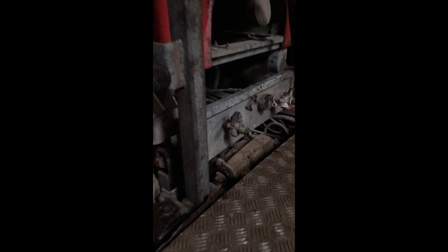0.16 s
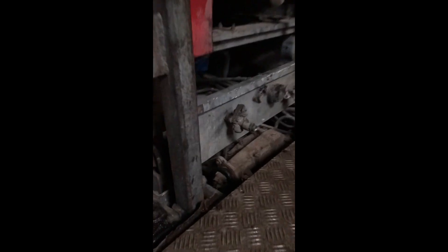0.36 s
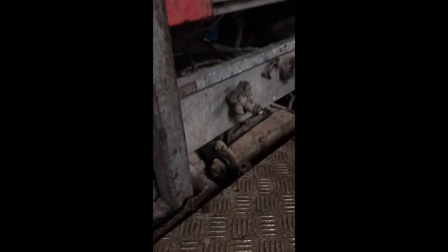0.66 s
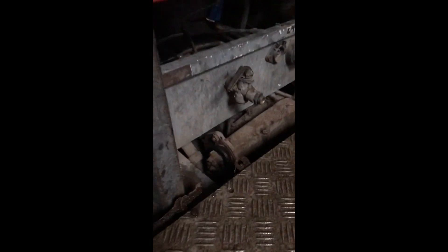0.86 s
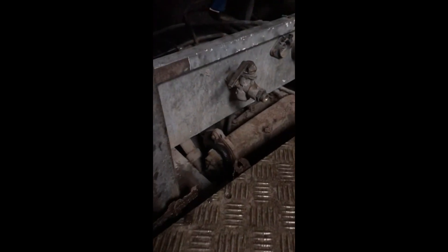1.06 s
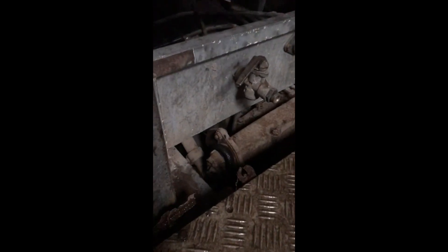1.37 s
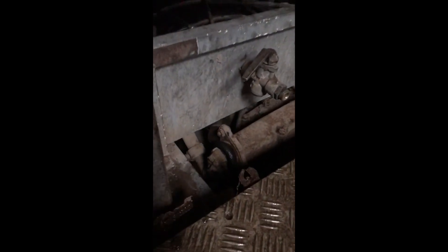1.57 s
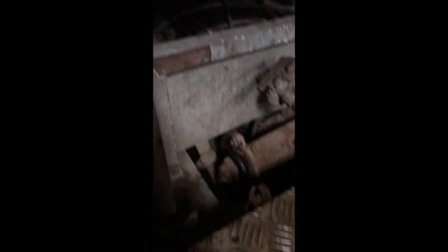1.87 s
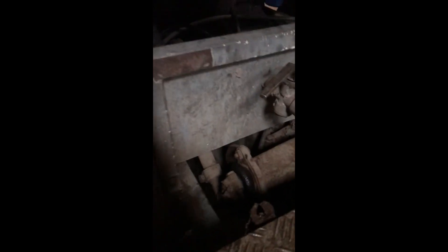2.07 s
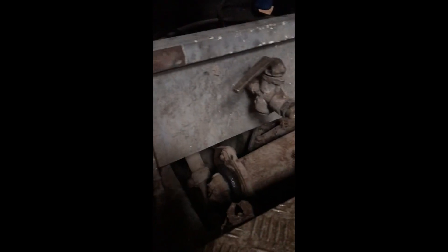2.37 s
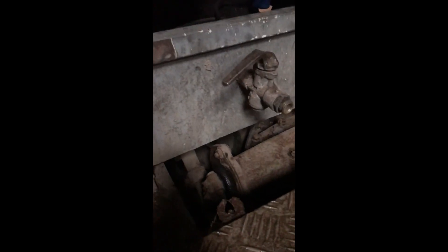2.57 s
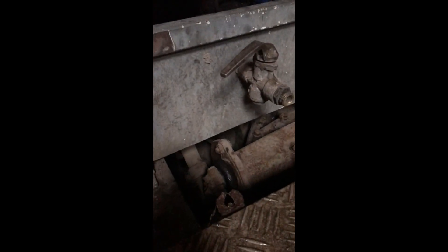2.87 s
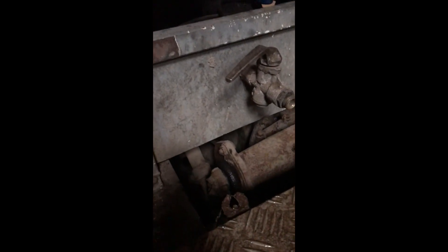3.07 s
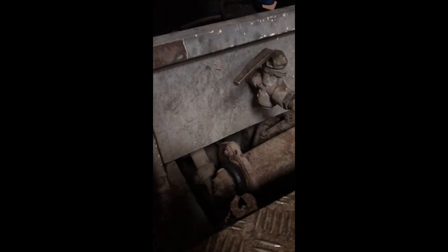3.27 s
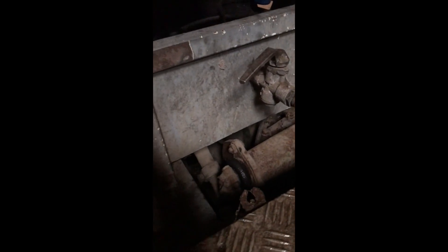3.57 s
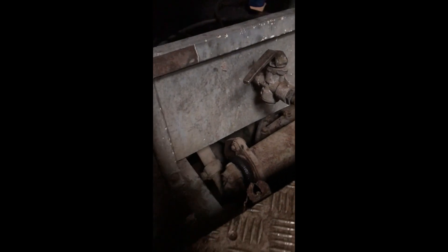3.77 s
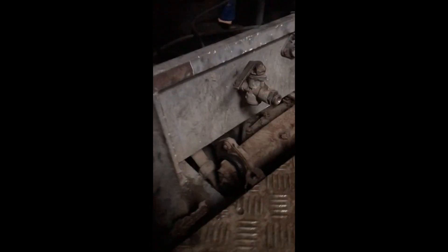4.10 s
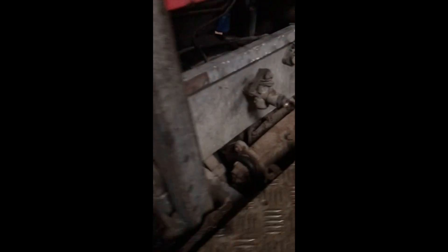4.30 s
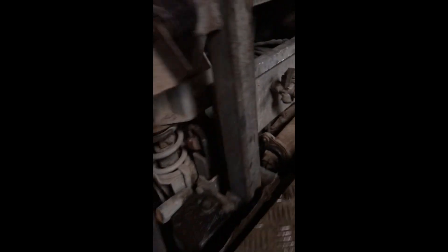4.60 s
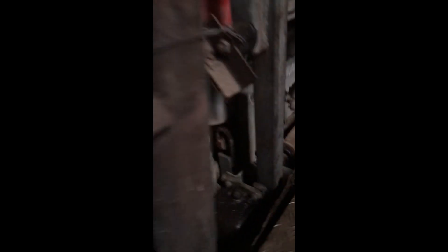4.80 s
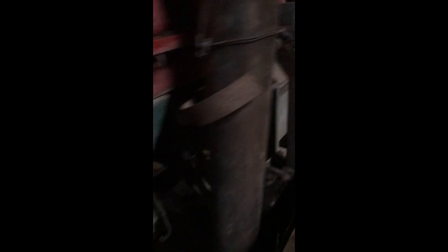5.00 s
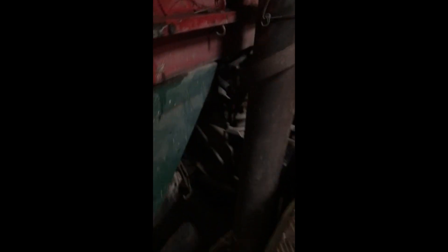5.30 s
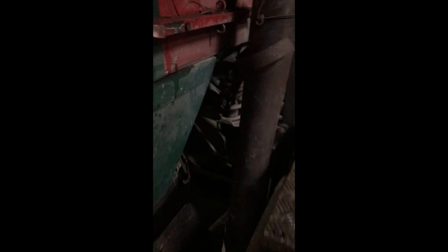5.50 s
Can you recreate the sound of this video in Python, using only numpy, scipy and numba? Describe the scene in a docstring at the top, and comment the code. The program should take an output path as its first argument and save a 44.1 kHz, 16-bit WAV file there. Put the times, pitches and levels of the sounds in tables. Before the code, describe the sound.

A phone sits close to a truck's chassis in a garage. A hissing air release is already dying away at the start. A short low groan sinks at 0.3 s, a thin high whisper of feed air follows from 0.45 s, and the valve gear gives a dull-then-bright knock at 0.9 s. At 1.2 s air blasts out with a crack and thump, chokes at 1.4 and 1.5 s, then drains with a ringing, falling hiss; a groan follows at 1.8 s. The second round groans at 2.3 s, whispers, swishes faintly and knocks at 2.9 s, then bursts loudest at 3.2 s, stuttering before draining and groaning at 3.7 s. The third groans at 4.1 s, knocks at 4.65 s, swishes at 4.8 s and blasts at 4.9 s, stuttering twice, with a last groan around 5.3 s. Metallic reflections, brief room echo, wavering faint hiss and low rumble surround everything.

```python
"""A parked truck's air brakes are applied and let off again and again in a garage, a phone close to the chassis.
At first a release is dying away. Then come three rounds: the linkage groans, feed air whispers and the valve
gear knocks; a faint swish comes before the second round's knock, another before the third round's release.
The port opens with a blast of noise, chokes twice and drains with a ringing hiss of gliding, filtered noise; the
linkage groans again. Steel plates echo the air, the garage rings briefly; a wavering hiss and a rumble lie below."""
import sys
import numpy as np
from scipy import signal
from scipy.fft import rfft, irfft
from scipy.io import wavfile
from scipy.ndimage import map_coordinates
from numba import njit

SR = 44100
rng = np.random.default_rng(int(sys.argv[2]) if len(sys.argv) > 2 else 0)


def inscribe(sig):
    """Save sig as 16-bit PCM at rate SR to the path in sys.argv[1].

    A 1-D sig is mono; a 2-D sig holds one channel per row.
    Samples are clipped to [-1, 1] before scaling.
    """
    pcm = np.round(np.clip(np.atleast_2d(sig).T, -1, 1) * 32767)
    wavfile.write(sys.argv[1], SR, pcm.astype(np.int16))


N = 249165
T = np.arange(N) / SR  # time, s
HZ = np.maximum(np.fft.rfftfreq(N, 1 / SR), 1)

# the brakes are let off; the first release is already dying away: start [t/s], jet [level/dB],
# kick over the port [level/dB], port [level/dB], spray once the valve is wide, before its widening lift [level/dB],
# hold [t/s], port fade [t/s], top port pitch [f/Hz], late sink of the pitch [Hz per s]
RELEASES = [(-0.68, -15.5, 10, -28, -34, .51, 0.44, 4220, 0),
            (1.225, -15.2, 12, -23.5, -32.4, .5, 0.31, 4130, 100),
            (3.170, -13, 7.5, -23.6, -33, .48, 0.32, 4150, 100),
            (4.917, -17.8, 16.5, -26, -34.1, .48, 0.31, 4020, 1600)]
OPEN_S, BLAST_S = 0.011, 0.133  # the port opens; the full-pressure jet lasts


def undb(db):
    """Turn decibels into gain."""
    return 10 ** (np.asarray(db) / 20)


def unit(x):
    """Scale to an average strength (rms) of 1."""
    return x / np.sqrt(np.mean(x ** 2))


def shape(points):
    """Gain at every frequency, drawn through (Hz, dB) points."""
    hz, db = np.transpose(points)
    return undb(np.interp(np.log(HZ), np.log(hz), db))


def noise(gain):
    """Noise of rms 1 with the given gain at every frequency."""
    return unit(irfft(rfft(rng.standard_normal(N)) * gain, N))


def walk(rate):
    """Smooth random wandering of rms 1 that changes about rate times a second."""
    return noise(1 / (1 + (HZ / rate) ** 4))


def gate(start, length, rise, fall):
    """Open in rise s, stay open until start + length, then die away with time constant fall."""
    return np.clip((T - start) / rise, 0, 1) * np.exp(-np.maximum(T - start - length, 0) / fall)


@njit
def bandpass(x, hz, width):
    """A resonance whose centre can move: two stored values swing against each other."""
    y, band, low = np.empty(len(x)), 0., 0.
    for i in range(len(x)):
        g, k = np.tan(np.pi * hz[i] / SR), width / hz[i]
        v = (band + g * (x[i] - low)) / (1 + g * (g + k))
        band, low = 2 * v - band, low + 2 * g * v
        y[i] = k * v
    return y


def glide(centre, width, source):
    """Two moving resonances in a row, scaled to rms 1."""
    return unit(bandpass(bandpass(source, centre, width), centre, width))


def blasts(crack_db=3, crack_s=0.013, thump_s=0.052, sag_db_per_s=64, thump_db=-24.2):
    """A broad jet starts with a crack and a thump, sags with the pressure and is cut off."""
    # colour of the jet: [f/Hz], [level/dB per Hz]
    jet_colour = [(60, -37.5), (300, -18.5), (700, -11.5), (1200, -10.5), (2000, -7.5), (2700, -2),
                  (4500, -5), (5600, -1.5), (7000, -3), (10000, -2), (11500, 2), (15800, 0)]
    # colour of the thump: [f/Hz], [level/dB per Hz]
    thump_colour = [(10, -62.5), (30, -19), (60, -2.5), (125, -3), (190, -6), (260, -3), (500, -19),
                    (1500, -44.5)]
    jet, thump, out = noise(shape(jet_colour)), noise(shape(thump_colour)), 0
    for start, jet_db, *_ in RELEASES:
        age = np.maximum(T - start, 0)
        level_db = jet_db - sag_db_per_s * age + crack_db * np.exp(-age / crack_s)
        out += jet * gate(start, BLAST_S, OPEN_S, 0.0058) * undb(level_db)
        out += thump * gate(start, 0.0052, .004, thump_s) * undb(jet_db + thump_db)  # level is over the jet's
    return out


def drain(port_width_hz=1890.0, core_width_hz=930.0, core_db=-5, flutter_db=0.46, sputter_db=.8):
    """Turbulent air rings the port; fine spray and a low rush go with it; the valve chokes all three."""
    # the valve nearly shuts for a moment: [t/s], depth [level/dB], half width [t/s], surge just before [level/dB]
    choke_rows = [(1.409, 18.5, 0.012, 2.5), (1.5, 11.5, .016, 1), (3.332, 13.5, 0.016, 5.5),
                  (3.435, 4.5, .014, 0), (5.079, 8, 0.009, -1), (5.17, 7.5, 0.02, 6)]
    # colour of the fine spray: [f/Hz], [level/dB per Hz]
    spray_colour = [(2000, -28), (5000, -2), (7000, -12), (8200, -5), (9700, 2.5), (10500, 0.5), (11500, 3),
                    (13000, -4.5), (15800, -3.5)]
    # colour of the low rush: [f/Hz], [level/dB per Hz]
    rush_colour = [(60, -26.5), (250, -11.5), (500, -15), (900, -5.5), (1400, -5.5), (1800, -1.5),
                   (2600, 2), (3500, -2.5), (6000, -17)]
    kick_s, jet_port_db = 0.011, -4  # opening kicks the port into ringing; under the jet it rings less
    wide_after_s, widening_s = 0.392, 0.02  # then the valve opens wide
    jet_sag_hz, wide_drop_hz = 420, 490  # pitch sags under the jet and recovers, then drops as the valve widens
    early_spray_db_per_s, wide_spray_db, late_port_db_per_s = 21, 6.5, 12
    fade_s = 0.3  # of spray and rush; the port has its own
    port_fade_db, spray_fade_db, rush_fade_db = 33, 22, 10  # lost in one fade time; the rush lasts longest
    rush_db = -4.4  # over the spray
    surge_lead_s, surge_width_s = 0.028, 0.016  # air speeds up through the narrowing gap before a choke

    port, spray, rush, centre = np.zeros((4, N))
    for start, _, kick_db, port_db, spray_db, hold, port_fade, top_hz, sink in RELEASES:
        age = np.clip(T - start, 0, 1)
        opening = gate(start, 1, OPEN_S, .03)
        wide = .5 + .5 * np.tanh((age - wide_after_s) / widening_s)
        late = np.maximum(age - wide_after_s, 0)
        # after the hold the pressure runs out ever faster
        spent = (np.maximum(age - hold, 0) / fade_s) ** 3
        port_spent = (np.maximum(age - hold, 0) / port_fade) ** 3

        start_db = kick_db * np.exp(-((age - OPEN_S) / kick_s) ** 2) + jet_port_db * (age < BLAST_S)
        late_db = -late_port_db_per_s * late
        early_db = early_spray_db_per_s * np.maximum(wide_after_s - age, 0)  # spray thins until the valve widens
        port += opening * undb(port_db + start_db + late_db - port_fade_db * port_spent)
        spray += opening * undb(spray_db + early_db + wide_spray_db * wide - spray_fade_db * spent)
        rush += opening * undb(spray_db + rush_db - rush_fade_db * spent)

        sag = np.interp(age, [0, BLAST_S, wide_after_s], [0, 1, 0])
        pitch = top_hz - jet_sag_hz * sag - wide_drop_hz * wide - sink * late
        centre = np.where((T >= start) | (centre == 0), pitch, centre)

    choke_db, surge_db = 0, 0
    for at, depth_db, width, lift_db in choke_rows:
        choke_db -= depth_db * np.exp(-((T - at) / width) ** 2)
        surge_db += lift_db * np.exp(-((T - at + surge_lead_s) / surge_width_s) ** 2)
    # a broad resonance with a narrower, half whistling core; both glide with the opening
    skirt = glide(centre, port_width_hz, noise(1))
    core = glide(centre, core_width_hz, noise(1))
    ring = unit(skirt + undb(core_db) * core) * undb(surge_db + flutter_db * walk(45))
    air = port * ring + spray * noise(shape(spray_colour)) + rush * noise(shape(rush_colour))
    return air * undb(choke_db + sputter_db * walk(400))


def housing(air):
    """Valve housing and chassis strengthen some pitches and weaken others, each release in its own way."""
    # resonances and notches where the phone is, one table a release: [f/Hz], width [f/Hz], lift [level/dB]
    first = [(850, 48, 10), (1670, 38, 8.2), (3020, 230, 2.5), (3860, 140, -4), (4608, 37, 4),
             (5460, 97, 6)]
    second = [(1003, 37, 7), (1189, 75, 8), (1799, 55, 7), (2159, 105, -11), (3015, 35, 9), (3540, 75, 11),
              (3662, 45, 8.5), (4122, 45, 7), (4450, 500, 3), (7802, 60, 9), (8234, 65, 11), (9091, 110, 7),
              (11480, 160, 6), (13008, 65, 7)]
    third = [(885, 110, 6), (1180, 55, 11), (1620, 130, -10), (1790, 58, 11), (2100, 90, -11),
             (2600, 160, 6), (3540, 150, 9), (3850, 55, 8), (4490, 220, 10.5), (4840, 80, -8),
             (7778, 65, 10), (9661, 160, 9), (10600, 500, -7), (11120, 260, 12)]
    fourth = [(1140, 90, -10), (1570, 57, -3), (2210, 160, -7), (2541, 20, 9), (2692, 60, 4),
              (2929, 47, -8), (3015, 40, 8), (3300, 45, 8), (3540, 60, 7), (3730, 50, -7), (4320, 60, 6),
              (4480, 55, 8), (12930, 200, 4.5), (14080, 250, 6.5)]
    out, starts = 0, [row[0] for row in RELEASES]
    for begin, end, table in zip(starts, starts[1:] + [np.inf], (first, second, third, fourth)):
        part = air * ((T >= begin) & (T < end))
        for hz, width, db in table:  # one peaking filter each
            cos = np.cos(2 * np.pi * hz / SR)
            damp, lift = np.pi * abs(width) / SR, undb(db / 2)
            top = [1 + damp * lift, -2 * cos, 1 - damp * lift]
            bottom = [1 + damp / lift, -2 * cos, 1 - damp / lift]
            part = signal.lfilter(top, bottom, part + 1e-18)  # the tiny offset avoids slow, near-zero numbers
        out = out + part
    return out


def chassis(x, echo=.15, drift_s=.00002, plate_hz=1500., count=8):
    """Nearby steel plates reflect the short waves and comb the hiss; the paths drift as the phone moves."""
    out = x.copy()
    short = signal.sosfilt(signal.butter(2, plate_hz, "high", fs=SR, output="sos"), x + 1e-18)
    for lag in rng.uniform(.001, .012, count):  # delay of each path, s
        place = (T - lag - drift_s * walk(.7)) * SR
        out += echo * map_coordinates(short, [place], order=3)
    return out / np.sqrt(1 + count * echo ** 2)


def knocks(ring_s=0.014, contact_s=0.0014, tick_db=-3, tick_s=0.0017):
    """A sharp tick and a short, heavily damped ring of noise; a softer contact has less treble."""
    # knocks in the valve gear, mostly a dull blow and then a brighter one:
    # [t/s], [level/dB], low edge [f/Hz], high edge [f/Hz]
    knock_rows = [(0.496, -61.5, 40, 248), (0.91, -42, 120, 1380), (0.922, -47, 700, 4510),
                  (2.625, -63.5, 1500, 6000), (2.892, -42, 120, 1500), (2.903, -43, 800, 5630),
                  (4.645, -44, 120, 1424), (4.657, -46, 700, 4220)]
    # colour of a knock: [f/Hz], [level/dB per Hz]
    knock_colour = [(50, -9.5), (150, -1.5), (330, 3), (700, -2), (1400, -2), (2100, -9), (3400, -1.5),
                    (5000, -15.5), (6400, -10.5), (9000, -11), (15000, -25)]
    out = 0
    for start, db, low_hz, high_hz in knock_rows:
        band = 1 / np.sqrt((1 + (low_hz / HZ) ** 2) * (1 + (HZ / high_hz) ** 4))
        ring = gate(start, contact_s, .001, ring_s)
        tick = undb(tick_db) * gate(start, contact_s, 0.0013, tick_s)
        out += undb(db) * (ring + tick) * noise(shape(knock_colour) * band)
    return out


def groans(droop=0.77, width_hz=63.0, shudder_db=-6):
    """Uneven slips in the linkage ring a low resonance that sinks as the motion slows, and shake the frame."""
    # the linkage groans as it moves: [t/s], ring before friction [level/dB], length [t/s], starting pitch [f/Hz]
    groan_rows = [(0.279, -53.5, 0.11, 215), (1.802, -54, 0.15, 190), (2.337, -48, 0.075, 219),
                  (3.713, -57, 0.14, 180), (4.077, -49.5, 0.163, 214.5), (5.328, -53.5, 0.097, 183)]
    # shudder of the frame under a groan: [f/Hz], [level/dB per Hz]
    shudder_colour = [(10, -60), (30, -18), (50, 13), (110, -2), (250, 4), (350, -8.5), (700, -51)]
    slips, shudder, out = noise(1), noise(shape(shudder_colour)), 0
    for start, db, length, hz in groan_rows:
        centre = hz * np.exp(-droop * np.clip((T - start) / length, 0, 1))
        ring = np.tanh(glide(centre, width_hz, slips) / 2) * 2  # friction limits each slip
        motion = gate(start, length / 2, 0.0088, length * 0.15)  # full for half the length, then fades
        out += undb(db) * motion * (ring + undb(shudder_db) * shudder)
    return out


def feeds():
    """Noise makes a thin whisper in the lines while the chambers fill."""
    # feed air filling the brake chambers: [t/s], length [t/s], [level/dB]
    feed_rows = [(0.44, 0.52, -69), (2.414, 0.46, -64), (4.184, 0.467, -68)]
    # colour of the whisper: [f/Hz], [level/dB per Hz]
    feed_colour = [(1000, -10), (5500, -11), (6500, 7.5), (7300, 8.5), (8000, -18), (9200, 3), (10500, -11),
                   (13500, -1), (15800, -8.5)]
    flow = sum(undb(db) * gate(start, length, 0.017, .02) for start, length, db in feed_rows)
    return noise(shape(feed_colour)) * flow


def swishes():
    """Air seeps past a seat that is about to move, and swells."""
    # faint swishes just before a valve moves: [t/s], length [t/s], [level/dB], centre [f/Hz]
    swish_rows = [(2.797, 0.076, -67, 620), (2.82, 0.055, -71.5, 1800), (4.81, 0.086, -61.5, 1840),
                  (4.855, 0.058, -61.5, 3660)]
    out = 0
    for start, length, db, hz in swish_rows:
        band = 1 / (1 + (2 * np.log2(HZ / hz)) ** 2)
        out += undb(db) * gate(start, length, length * .6, 0.0088) * noise(band)
    return out


def octave(spectrum, centre):
    """The part of a spectrum around one centre, fading to nothing an octave away."""
    return irfft(spectrum * np.clip(1 - abs(np.log2(HZ / centre)), 0, 1), N)


def reverberation(x, gap_s=0.0077):
    """Many blurred echoes, made of fading noise in octave bands; the highest treble dies first."""
    # reverberation of the garage: [f/Hz], time to fall by 60 dB [t/s], [level/dB]
    room = [(100, 0.53, -10.5), (981, 0.46, -2.5), (3520, 0.78, -10), (7000, .36, -16.5),
            (14070, .22, -13.5)]
    hz, t60, db = np.transpose(room)
    white, tail = rfft(rng.standard_normal(N)), 0
    for centre in 62.5 * 2 ** np.arange(9):
        decay = np.interp(np.log(centre), np.log(hz), t60)
        wet_db = np.interp(np.log(centre), np.log(hz), db)
        # the tail rises between 0.5 and 1.5 gaps, and falls by 60 dB in the decay time
        fade = np.clip(T / gap_s - .5, 0, 1) * np.exp(-np.log(1000) * T / decay)
        tail += undb(wet_db) * octave(white, centre) * fade / np.sqrt(np.sum(fade ** 2))
    return signal.fftconvolve(x, tail)[:N]


def background(waver_db=0.54, rumble_db=-67, rise_s=0.05, fall_s=0.09):
    """Low noise rumbles and swells now and then; the bands of a faint hiss waver on their own."""
    # colour of the hiss: [f/Hz], [level/dB per Hz]
    hiss_colour = [(10, -72), (30, -18.5), (60, -8.5), (160, -13), (300, -12.5), (450, -21), (1000, -17.5),
                   (2000, -21.5), (4500, -23.5), (7000, -23), (9000, -20), (10500, -23), (13000, -15),
                   (15800, -17.5)]
    # level of the hiss: [t/s], [level/dB]
    hiss_level = [(0, -61.5), (.8, -58.2), (2.3, -56.8), (3.1, -58.8), (4.2, -56), (4.6, -60.5)]
    # colour of the rumble: [f/Hz], [level/dB per Hz]
    rumble_colour = [(10, -72), (25, -23), (35, -7), (50, 3.5), (100, -5), (155, -3), (250, -13.5),
                     (500, -24), (1500, -43.5)]
    # soft low rumbles of the frame, most of them after a groan: [t/s], length [t/s], [level/dB]
    rumble_rows = [(0.36, .07, -57), (1.84, .12, -51.5), (2.37, .07, -51), (4.16, .16, -57.5),
                   (4.54, .08, -54.5)]
    spectrum, hiss = rfft(noise(shape(hiss_colour))), 0
    for centre in 2 ** np.arange(5., 15.):
        hiss += octave(spectrum, centre) * undb(waver_db * walk(5))
    swells = sum(undb(db) * gate(start, length, rise_s, fall_s) for start, length, db in rumble_rows)
    rumble = noise(shape(rumble_colour)) * np.hypot(undb(rumble_db), swells)  # steady part and swells
    return hiss * undb(np.interp(T, *np.transpose(hiss_level))) + rumble


def scene():
    """The air system, its reflections and the garage, the same in both ears."""
    air = drain() + blasts()
    works = knocks() + groans() + feeds() + swishes()
    mono = chassis(housing(air)) + works + reverberation(air + works) + background()
    return np.array([mono, mono])


def record(dry, low_hz=32., top_hz=15780):
    """The phone thins the deepest bass and cuts the top."""
    thin = signal.sosfilt(signal.butter(2, low_hz, "high", fs=SR, output="sos"), dry)
    return signal.sosfilt(signal.ellip(12, .2, 70, top_hz, fs=SR, output="sos"), thin)


dry = scene()
out = record(dry)
inscribe(out)
```